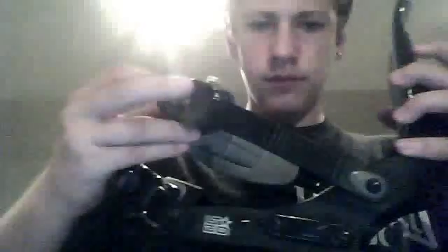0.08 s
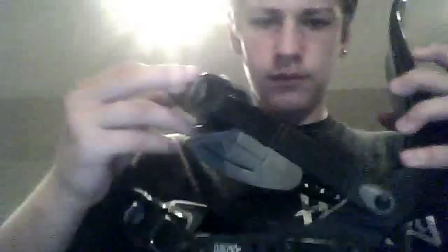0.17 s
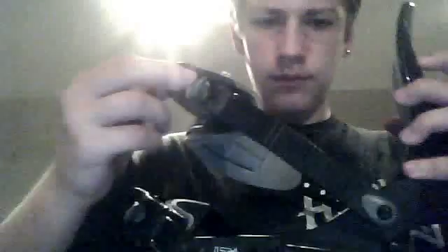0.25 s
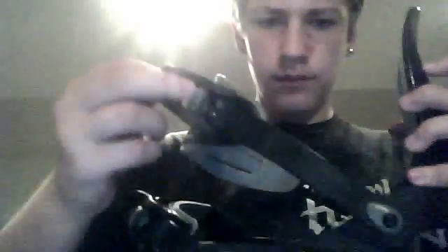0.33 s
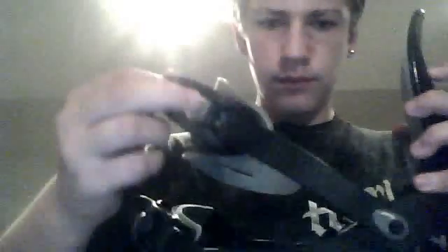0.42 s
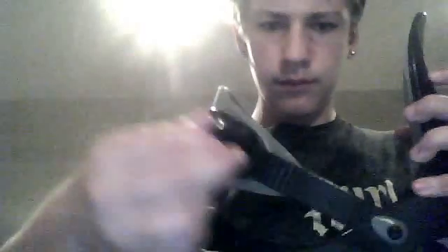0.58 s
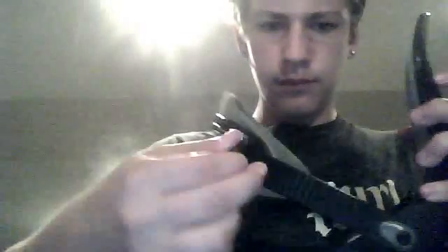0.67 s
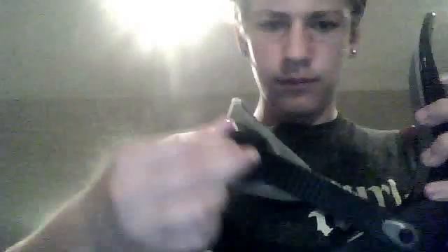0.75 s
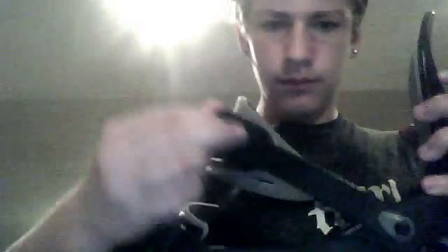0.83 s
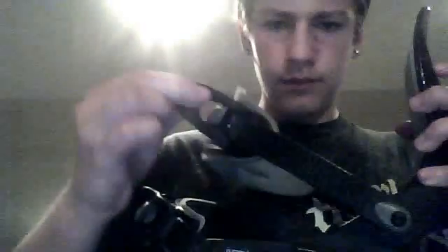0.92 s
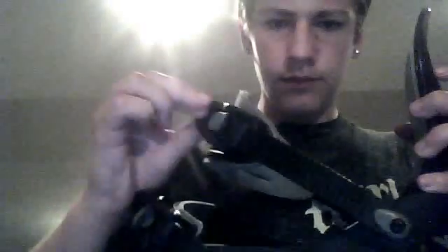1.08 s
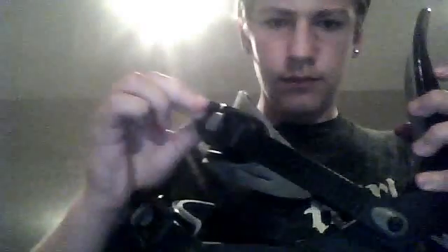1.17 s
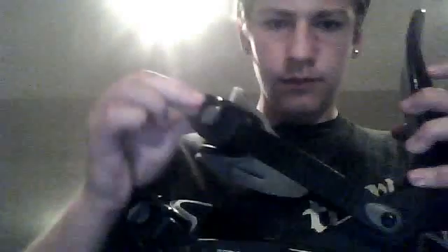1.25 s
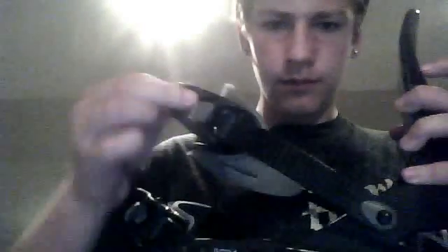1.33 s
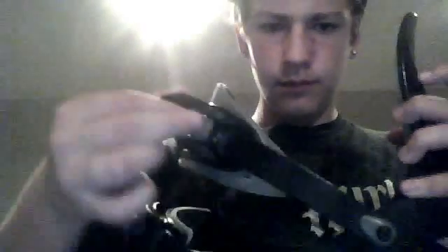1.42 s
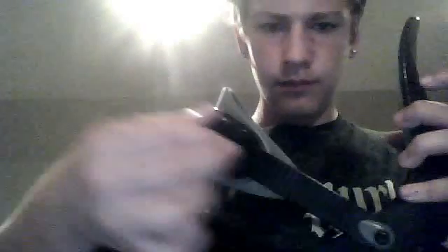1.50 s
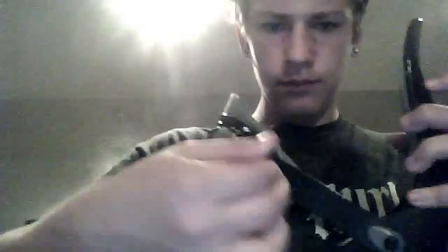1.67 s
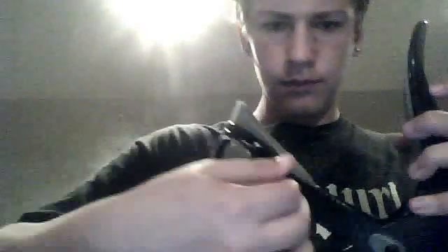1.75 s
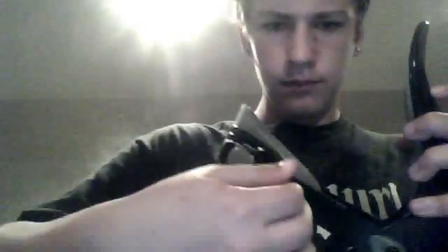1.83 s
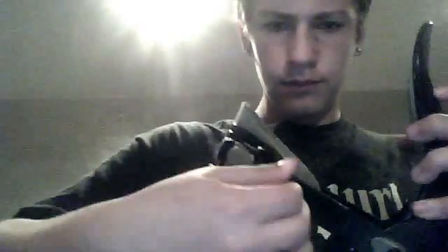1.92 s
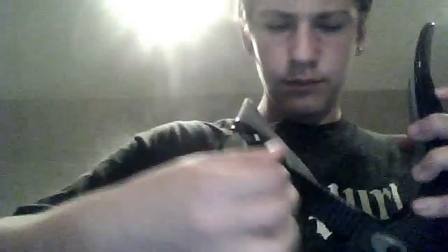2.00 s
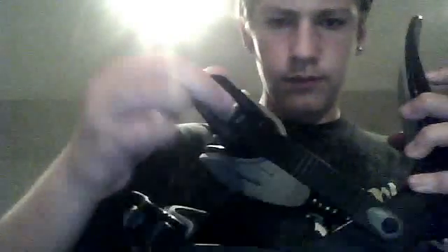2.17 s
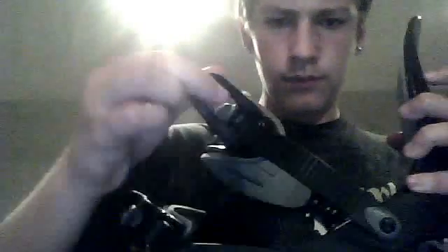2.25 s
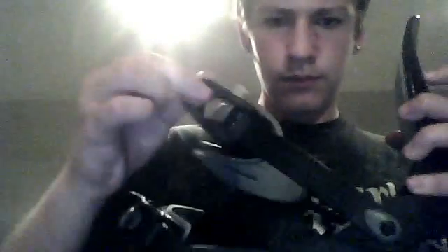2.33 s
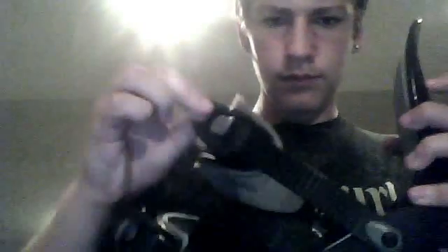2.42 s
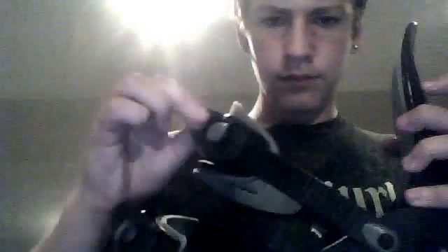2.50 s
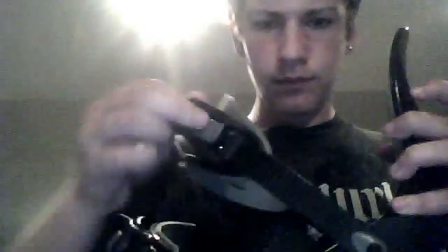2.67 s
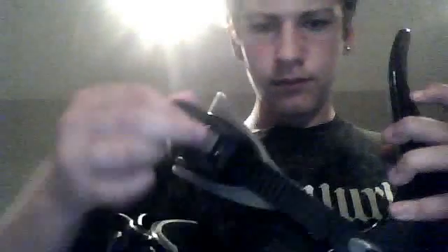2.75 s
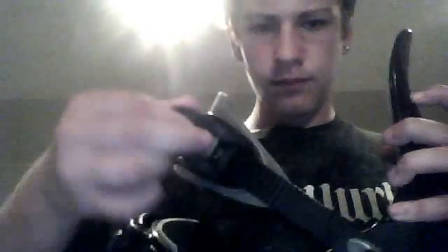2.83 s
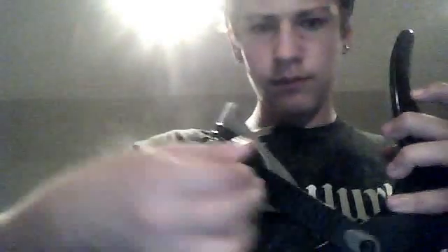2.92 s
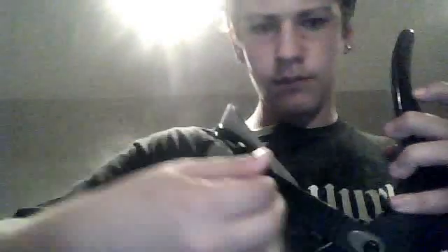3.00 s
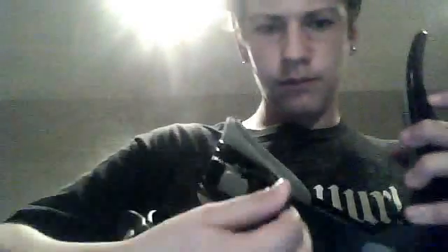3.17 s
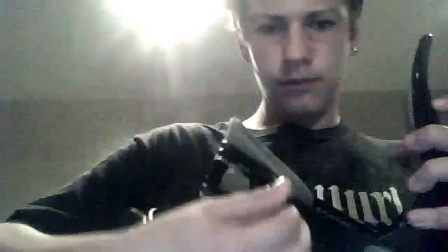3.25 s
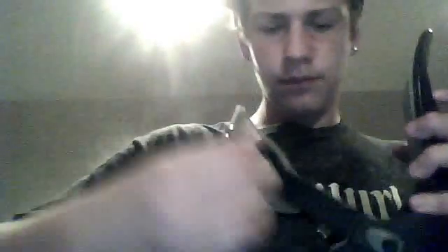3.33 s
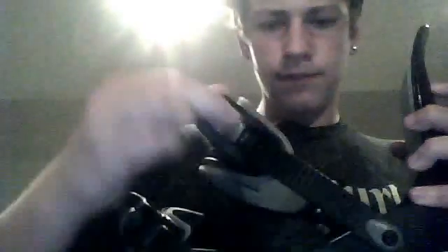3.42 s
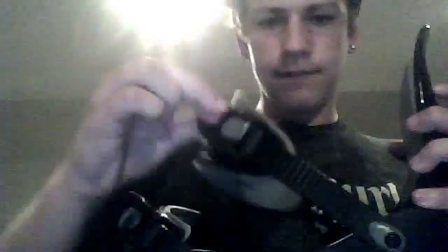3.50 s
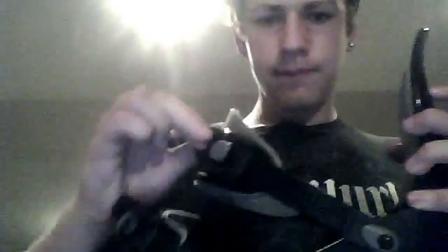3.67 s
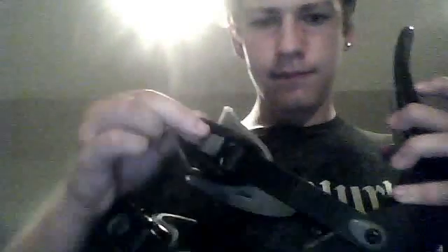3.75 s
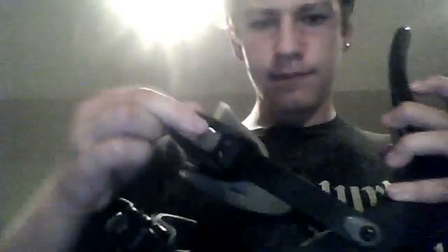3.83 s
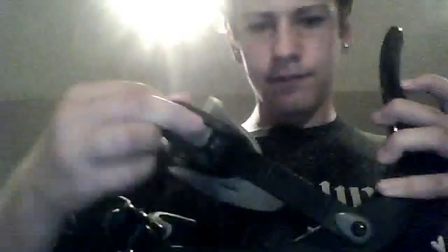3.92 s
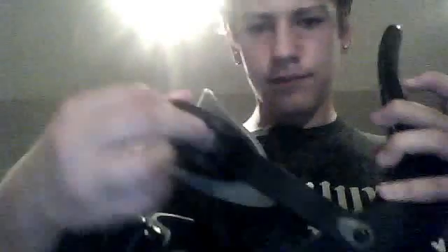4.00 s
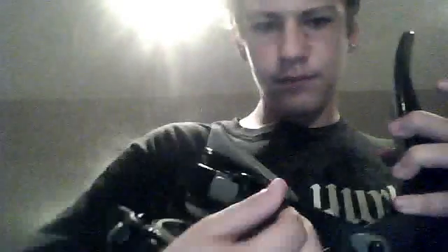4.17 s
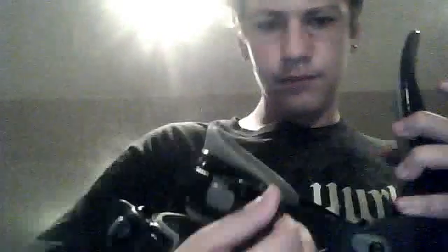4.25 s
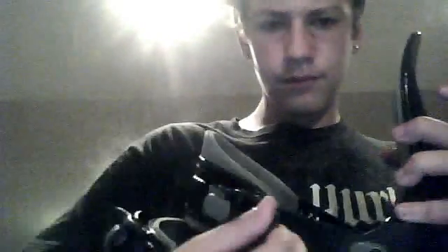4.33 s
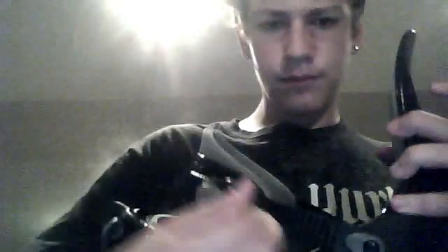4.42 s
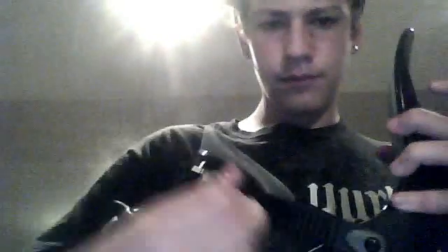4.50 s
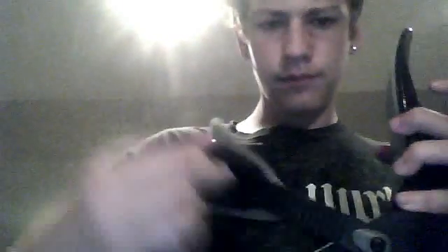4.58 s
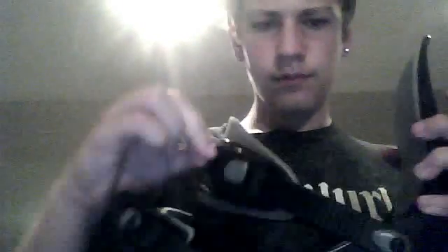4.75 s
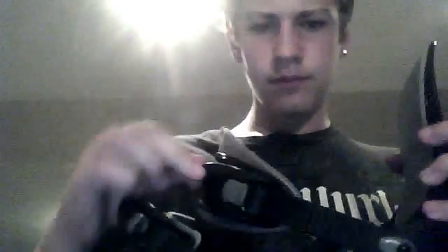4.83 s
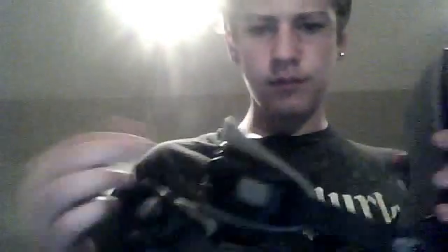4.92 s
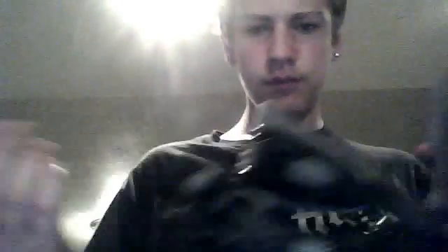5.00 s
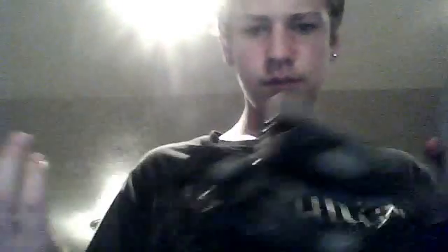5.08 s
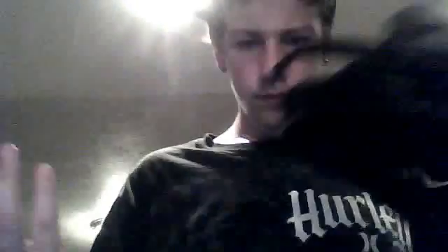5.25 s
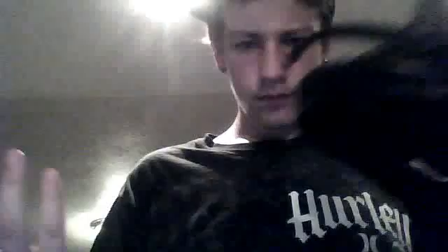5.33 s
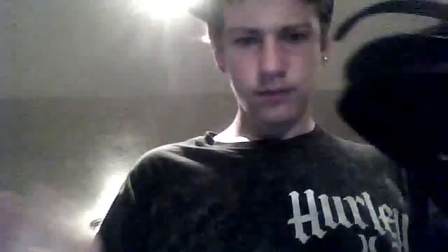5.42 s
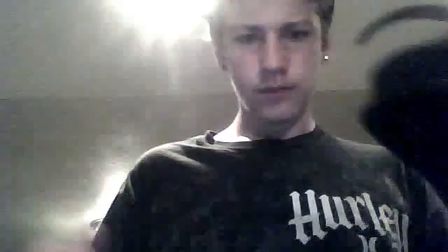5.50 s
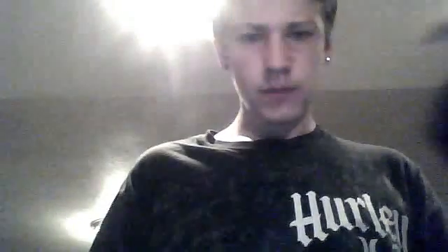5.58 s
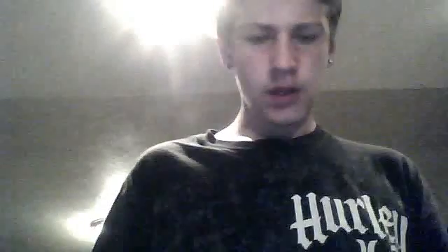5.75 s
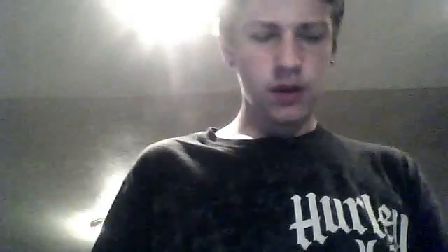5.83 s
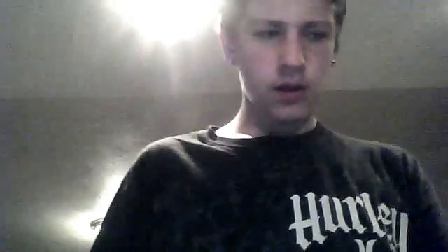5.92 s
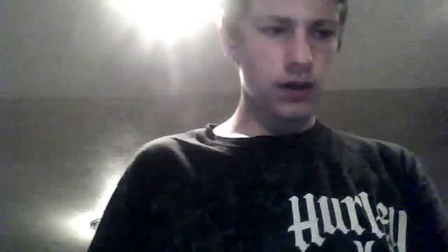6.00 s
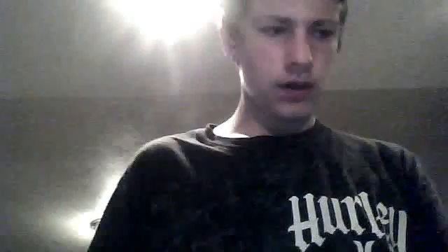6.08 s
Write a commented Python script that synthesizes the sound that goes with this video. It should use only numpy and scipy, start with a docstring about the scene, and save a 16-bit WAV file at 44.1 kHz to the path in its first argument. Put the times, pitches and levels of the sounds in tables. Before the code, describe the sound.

A plastic ratchet buckle snaps in four sharp pairs, each followed by a duller clack, over a steady low laptop hum.

```python
"""Sharp plastic snaps in pairs, each pair followed by a duller clack, over a steady laptop hum.
A ratchet buckle is worked by hand in a small room. Each of four lever strokes snaps the pawl over two
teeth of the ladder strap, ringing pawl and hollow body; the lever then falls back on the strap.
Fingers rub the strap. The laptop's disk and fan hum throughout, and at the end a hand bumps its case."""
import sys
import numpy as np
from scipy import signal
from scipy.fft import rfft, irfft, next_fast_len
from scipy.io import wavfile
from scipy.ndimage import uniform_filter1d, minimum_filter1d, map_coordinates

SR = 44100
rng = np.random.default_rng(int(sys.argv[2]) if len(sys.argv) > 2 else 0)


def log_audio(samples):
    """Write samples as a 16-bit WAV file to the path given in sys.argv[1]."""
    # one column per channel
    frames = np.atleast_2d(samples).T
    # limit to full scale, then quantise
    limited = np.clip(frames, -1, 1)
    pcm = np.round(limited * 32767).astype(np.int16)
    wavfile.write(sys.argv[1], SR, pcm)


N = 271788

# Pawl drops. Each row: start in seconds, relative level in dB, lever ring in dB, softness from 0 to 1.
PAWL_DROPS = [ (0.6292, -4, 9, 0), (0.6958, 1.5, -2, 0), (1.5735, 0.3, 0, 0), (1.6311, 1.7, -5, 0),
              (2.9191, 2, -2.5, 0), (2.9742, 3.5, -7, 0.95), (4.099, -1.3, 0.8, 0), (4.1307, 1, -5.5, 0.8)]
# Lever landings. Each row: start in seconds, relative level in dB, then strap thud, frame, lever ring
# and snap in dB, body pitch ratio.
LEVER_CLACKS = [(1.0208, 0.5, 18, -2, -7.5, -14, 1.08), (2.3868, -7, 22, -2, -3, -13, 1.05),
                (3.5297, -9.5, 16, -3, -1, -16, 0.97), (4.6788, 0, 11, 1, -4.5, -15, 0.93)]
# Slack lever in its hinge. Each row: start in seconds, relative level in dB, body pitch ratio.
HINGE_RATTLES = [(1.0615, -10, 1.02), (3.4462, -15, 0.97), (4.6275, -13.5, 0.96), (4.7245, -11.5, 0.82)]
# Grip shifts. Each row: start in seconds, relative level in dB.
GRIP_TICKS = [(1.3345, -26), (2.452, -23.5), (2.6972, -22), (2.747, -23), (2.851, -23), (3.3635, -23),
              (3.412, -25), (3.826, -22), (3.885, -20), (4.949, -22)]
# Bands of a blow in Hz: thud, body, frame, pawl, lever, snap.
BANDS_HZ = [480, 850, 1500, 2900, 4000, 7000]
# Stiff pawl and lever. Each row: nominal frequency in Hz, width in Hz, gain in dB.
PAWL_MODES = [(1990, 340, -20), (2830, 306, -8), (3430, 330, -12), (3927, 283, -6.5), (4950, 380, -10.5),
              (5300, 500, -14), (6850, 600, -3), (7700, 910, -4.5), (8930, 464, -10)]
# Hollow body of buckle and strap. Each row: nominal frequency in Hz, width in Hz, gain in dB.
BODY_MODES = [(433, 212, -27.5), (647, 164, -13.5), (806, 98, 2.5), (897, 141, -0.5), (1330, 73, -10.5),
              (1650, 104, -13.5)]
# Fingers on the strap. Each row: centre in seconds, length in seconds, level in dB.
STRAP_RUBS = [(0.047, 0.13, -52), (0.655, 0.08, -47), (1.965, .08, -49), (2.055, .08, -50.5),
              (2.46, 0.058, -54), (3.504, 0.13, -44.5), (4.867, 0.13, -47)]
# Wall response to a blow. Each row: frequency in Hz, relative gain in dB.
WALL_COLOUR_DB = [(300, -30), (640, -24), (820, -8), (1080, -20), (1500, -20), (2300, -26.5), (3050, -16.5),
                  (3700, -16), (4400, -12), (5600, -18.5), (7500, -17.5), (9500, -26.5)]
# Room decay. Each row: frequency in Hz, T60 in seconds.
ROOM_T60_S = [(300, 0.45), (1000, 0.28), (4000, 0.28), (9000, 0.21)]
# Mains, spinning disk and a thin whine. Each row: frequency in Hz, rms level in dB.
HUM_TONES = [(60, -49.5), (89.9, -32.5), (120, -60.5), (2175, -74.5), (6368, -75)]
# Fan tones. Each row: multiple of the shaft rate, mean rms level in dB.
FAN_TONES = [(1, -55.5), (4, -55.5), (7, -62), (8, -66), (11, -63.5), (12, -51), (13, -63), (15, -64.5),
             (16, -67.5), (20, -67)]
# Air and microphone hiss. Each row: frequency in Hz, relative density in dB.
HISS_SHAPE_DB = [(20, 11.5), (45, 7), (120, 3.5), (200, 0), (450, -3), (850, -3.5), (1300, -7.5),
                 (2500, -11.5), (5200, -15), (6600, -14.5), (9200, -20), (9700, -24.5), (10700, -28.5)]


def ratchet(soft_pawl_cut_db=4, soft_snap_cut_db=13, soft_lag_s=0.0012):
    """The pawl snaps hard and bright over each tooth; a soft drop is duller and seats later."""
    track = np.zeros(N)
    for start_s, db, ring_db, soft in PAWL_DROPS:
        snap = blow(db, thud_db=-9, frame_db=-0.5, pawl_db=1.2 - soft_pawl_cut_db * soft,
                    lever_db=ring_db, snap_db=-1.5 - soft_snap_cut_db * soft,
                    body_ratio=1.035, lag_s=0.0002 + soft_lag_s * soft)
        add(track, start_s, snap)
    return track


def lever(ring_hz=3920, ring_t60_s=0.085):
    """The lever lands loosely: a dull clack and strap thud, with a thin ring that starts with them."""
    track, t = np.zeros(N), np.arange(SR // 4) / SR
    ring = amp(-29 - 60 * t / ring_t60_s) * np.sin(2 * np.pi * ring_hz * t)
    for start_s, db, thud_db, frame_db, ring_db, snap_db, ratio in LEVER_CLACKS:
        add(track, start_s, blow(db, thud_db, frame_db, pawl_db=-9, lever_db=ring_db,
                                 snap_db=snap_db, body_ratio=ratio, lag_s=0.0013))
        add(track, start_s, amp(db + ring_db) * ring)
    return track


def loose_parts():
    """Light contacts of the unloaded buckle ring mostly its body, with hardly any snap."""
    track = np.zeros(N)
    for start_s, db, ratio in HINGE_RATTLES:
        add(track, start_s, blow(db, thud_db=7, frame_db=1.5, pawl_db=-7, lever_db=-7,
                                 snap_db=-23, body_ratio=ratio, lag_s=0.0008))
    for start_s, db in GRIP_TICKS:
        add(track, start_s, blow(db, thud_db=6, frame_db=1.5, pawl_db=-12, lever_db=-16,
                                 snap_db=-28, body_ratio=1.01, lag_s=0.0009))
    return track


def blow(db, thud_db, frame_db, pawl_db, lever_db, snap_db, body_ratio, lag_s, grip_spread=0.02):
    """First touch rings the stiff pawl; on seating, lag_s later, it rings again with the hollow body."""
    t = np.arange(int(SR * 0.4)) / SR
    colour = list(zip(BANDS_HZ, [thud_db, 0, frame_db, pawl_db, lever_db, snap_db]))
    body = [(hz * body_ratio, width_hz, gain_db + along(colour, hz))
            for hz, width_hz, gain_db in BODY_MODES]
    # The changing grip detunes the stiff modes.
    pawl = [(hz * (1 + grip_spread * rng.normal()), width_hz, gain_db + along(colour, hz))
            for hz, width_hz, gain_db in PAWL_MODES]
    force = contact(t, chatter=1.15, t60_s=0.008)
    seat_gain = np.clip(lag_s / 0.0028, 0, 1)  # looser parts seat later and harder
    add(force, lag_s, seat_gain * contact(t, chatter=2.2, t60_s=0.012))
    force /= np.linalg.norm(force)
    click = resonate(force, pawl)
    add(click, lag_s, resonate(contact(t, chatter=0.18, t60_s=0.018), body))
    # Only the broad colour reaches the walls; the thud does not carry.
    spill = filtered(force, lambda f: amp(along(colour[1:], f)))
    return amp(db + 23) * room(click, spill)


def contact(t, chatter, t60_s):
    """Unit-energy force: one sharp impact, then brief chatter of the touching parts."""
    rattle = rng.standard_normal(len(t)) * amp(-60 * t / t60_s)
    spectrum = rfft((t == 0) + chatter * rattle / np.linalg.norm(rattle))
    # Hard contact feeds all bands about evenly; the struck part sets the colour.
    power = np.abs(uniform_filter1d(np.abs(spectrum) ** 2, size=240))
    force = irfft(spectrum / np.sqrt(power + 1e-9), len(t)) * (t < t[-1] / 2)
    return force / np.linalg.norm(force)


def rubbing():
    """The hand slides on the strap: small uneven slips excite its low resonances."""
    t = np.arange(N) / SR
    envelope = sum(amp(db) * np.exp(-(2 * (t - centre_s) / length_s) ** 2)
                   for centre_s, length_s, db in STRAP_RUBS)
    slips = rng.standard_normal(N) * amp(7.2 * wobble(rate_hz=110))
    return envelope * unit_rms(resonate(slips, [(440, 90, -6.5), (850, 220, -10.5)]))


def bump(push_s=4.6, push_db=-33, tap_s=6.146, tap_gain_db=8, thump_db=-24, thump_hz=30):
    """A hand leans on the laptop, later taps its case and rocks it."""
    t = np.arange(N) / SR
    track = amp(push_db) * np.exp(-((t - push_s) / 0.029) ** 2)
    t = t[:SR // 4]
    case_modes = [(170, 91, 1), (380, 330, -4), (775, 200, -0.5),
                  (1470, 190, -1.5), (3000, 900, -11.5), (4970, 1400, -14)]
    tap = amp(tap_gain_db) * resonate(contact(t, chatter=1.9, t60_s=0.011), case_modes)
    thump = amp(thump_db - 60 * t / 0.35) * np.sin(2 * np.pi * thump_hz * t)
    add(track, tap_s, tap - thump)
    return track


def room(direct, spill, wall_db=-3, wall_rise_s=0.0023, near_db=-8.5, near_rise_s=0.0022,
         near_t60_s=0.059):
    """Desk and chest scatter the direct sound at once; spill to the walls builds up and dies slowly."""
    t = np.arange(len(direct)) / SR
    hz, frames_s, noise = signal.stft(rng.standard_normal(len(t)), SR, nperseg=256)
    decay = amp(-60 * frames_s / along(ROOM_T60_S, hz)[:, None])
    tail = signal.istft(noise * decay, SR, nperseg=256)[1][:len(t)]
    tail *= 1 - np.exp(-(t / wall_rise_s) ** 2)
    tail = filtered(tail / np.linalg.norm(tail), lambda f: amp(wall_db + along(WALL_COLOUR_DB, f)))
    near = rng.standard_normal(len(t)) * amp(-60 * t / near_t60_s)
    near *= 1 - np.exp(-(t / near_rise_s) ** 2)
    near *= amp(near_db) / np.linalg.norm(near)
    return direct + (signal.fftconvolve(direct, near) + signal.fftconvolve(spill, tail))[:len(t)]


def hum():
    """Steady tones of mains and spinning disk, with a thin whine."""
    t = np.arange(N) / SR
    return sum(tone(db, hz * t) for hz, db in HUM_TONES)


def fan(mean_hz=66.42, swing_hz=0.33, period_s=2.05, fastest_s=0.55):
    """Shaft harmonics waver in level as the fan hunts slowly about its mean speed."""
    t = np.arange(N) / SR
    hunting_hz = swing_hz * np.cos(2 * np.pi * (t - fastest_s) / period_s)
    shaft_hz = (mean_hz + hunting_hz) * (1 + 0.00077 * wobble(rate_hz=9.6))
    turns = np.cumsum(shaft_hz) / SR
    return sum(tone(db + 1.54 * wobble(rate_hz=8), order * turns) for order, db in FAN_TONES)


def hiss(rms_db=-48, drift_db=0.9):
    """Air and microphone noise, drifting slightly in level."""
    noise = filtered(rng.standard_normal(N), lambda f: amp(along(HISS_SHAPE_DB, f)))
    return amp(rms_db + drift_db * wobble(rate_hz=4)) * unit_rms(noise)


def resonate(force, modes):
    """Drive modes of alternating sign. Each row: frequency in Hz, width in Hz, gain in dB."""
    def response(f):
        return sum((-1) ** k * amp(db) * 1j * f * width_hz / (hz * hz - f * f + 1j * f * width_hz)
                   for k, (hz, width_hz, db) in enumerate(modes))
    return filtered(force, response)


def filtered(x, response):
    """Apply a complex response, given as a function of Hz."""
    size = next_fast_len(len(x) + 8192)
    return irfft(rfft(x, size) * response(np.fft.rfftfreq(size, 1 / SR)), size)[:len(x)]


def tone(rms_db, cycles):
    """Sine with a random start phase."""
    return np.sqrt(2) * amp(rms_db) * np.sin(2 * np.pi * (cycles + rng.random()))


def wobble(rate_hz):
    """Smooth random curve with knots at rate_hz."""
    knots = rng.standard_normal(int(N * rate_hz / SR) + 4)
    return map_coordinates(knots, [np.arange(N) * rate_hz / SR])


def along(points, hz):
    """Interpolate (Hz, value) points on a log frequency axis."""
    knots_hz, values = np.transpose(points)
    return np.interp(np.log(hz + 1), np.log(knots_hz + 1), values)


def amp(db):
    """Decibels to gain."""
    return 10 ** (np.asarray(db) / 20)


def unit_rms(x):
    """Scale to rms 1."""
    return x / np.sqrt(np.mean(x ** 2) + 1e-20)


def add(track, start_s, sound):
    """Mix a sound into the track in place."""
    part = track[max(round(start_s * SR), 0):][:len(sound)]
    part += sound[:len(part)]


def limiter(x, ceiling, recover_db_per_s):
    """Peaks over the ceiling pull the gain down at once; it then creeps back."""
    over_db = 20 * np.log10(np.maximum(np.abs(x) / ceiling, 1))
    ramp_db = recover_db_per_s * np.arange(N) / SR
    cut_db = np.maximum.accumulate(over_db + ramp_db) - ramp_db
    gain_db = uniform_filter1d(minimum_filter1d(-cut_db, size=45), size=45)
    return x * amp(gain_db)


def scene():
    """Buckle, hands and laptop, in mono."""
    buckle = ratchet() + lever() + loose_parts()
    return (buckle + rubbing() + bump() + hum() + fan() + hiss())[None]


def record(dry):
    """The built-in microphone ducks under the sharpest snaps and cuts off the top treble."""
    cutoff_hz = 10700
    limited = limiter(dry[0], ceiling=0.58, recover_db_per_s=35)
    return filtered(limited, lambda f: 1 / np.sqrt(1 + (f / cutoff_hz) ** 70))[None]


dry = scene()
out = record(dry)
log_audio(out)
```